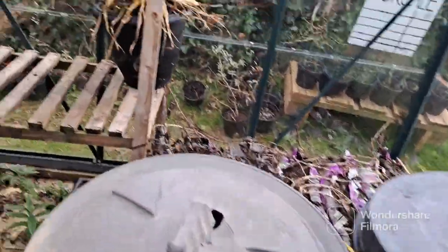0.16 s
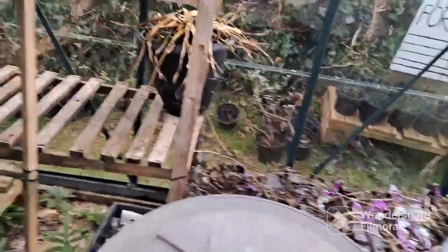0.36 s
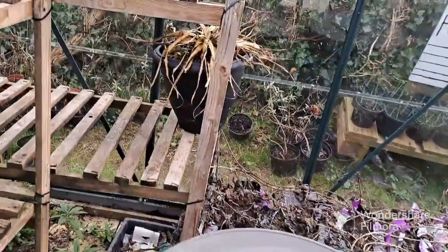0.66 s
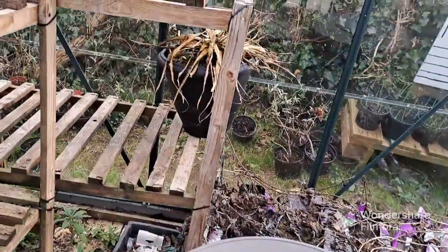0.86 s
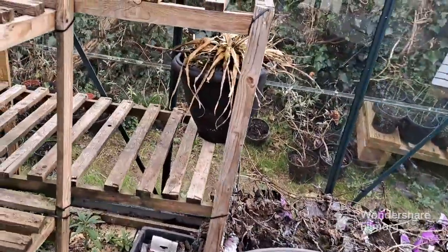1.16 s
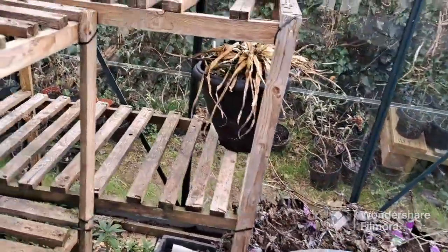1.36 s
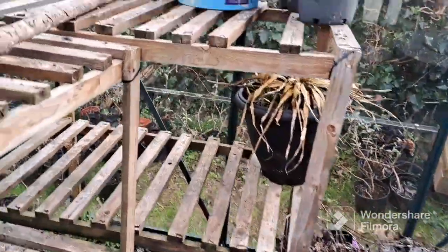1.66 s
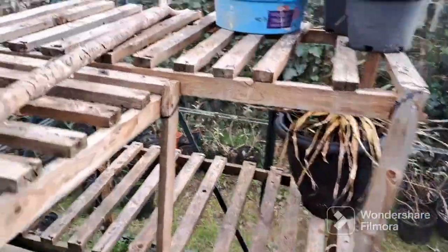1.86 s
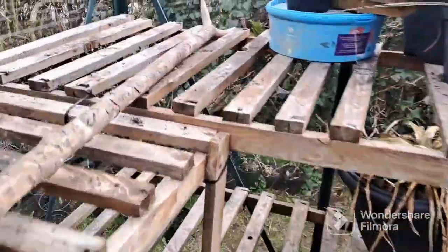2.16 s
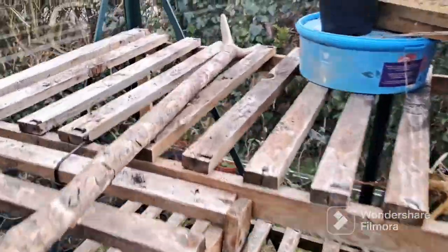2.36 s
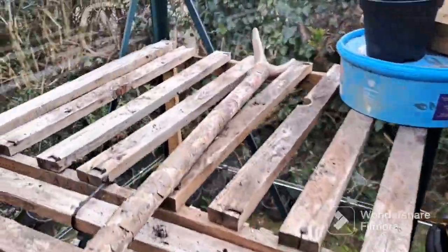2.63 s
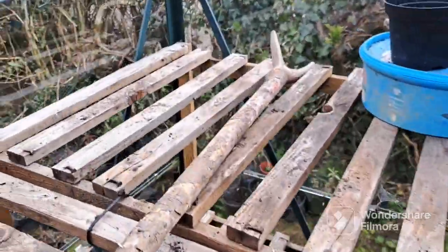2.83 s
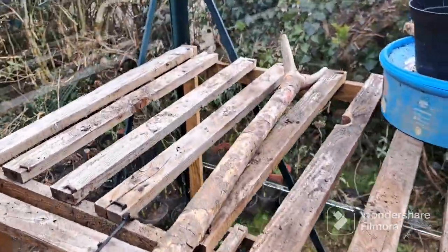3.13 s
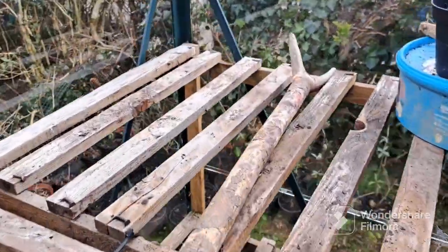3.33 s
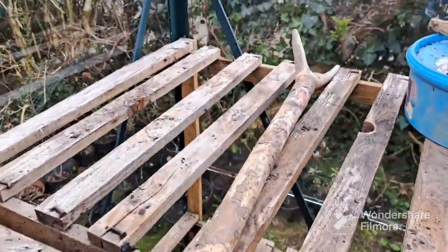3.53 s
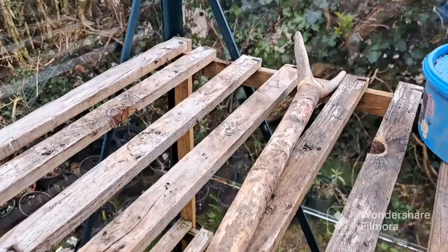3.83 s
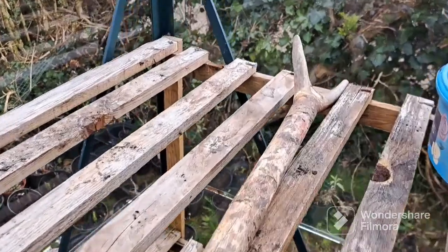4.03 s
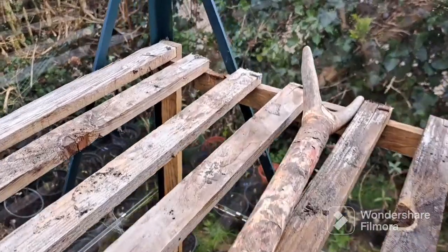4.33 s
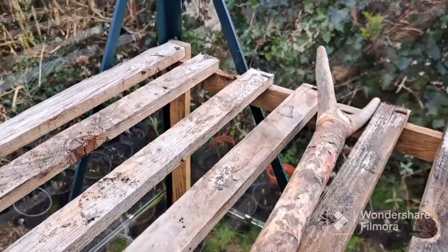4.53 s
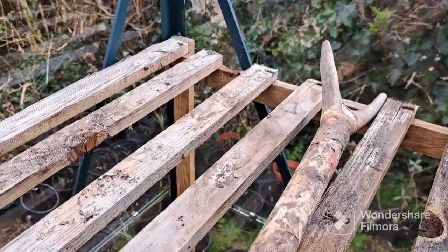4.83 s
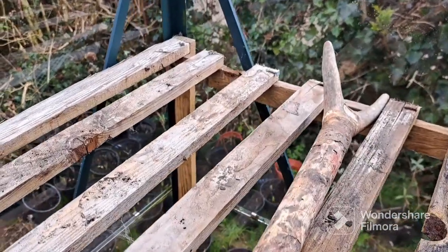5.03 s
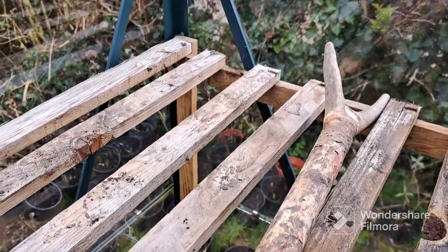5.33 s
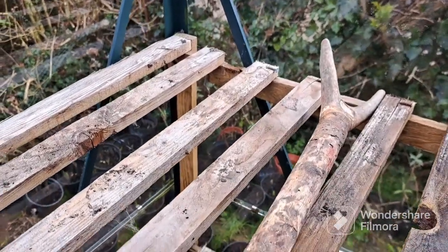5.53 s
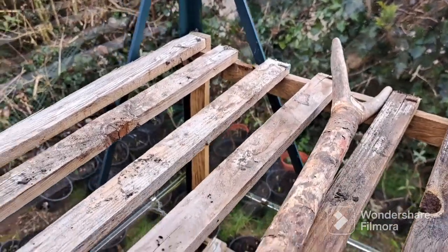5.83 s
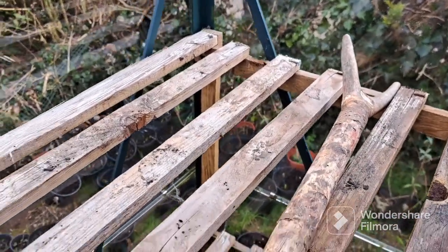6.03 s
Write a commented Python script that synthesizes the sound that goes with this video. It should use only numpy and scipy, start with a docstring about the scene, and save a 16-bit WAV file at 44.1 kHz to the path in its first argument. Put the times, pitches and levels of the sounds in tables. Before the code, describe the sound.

A close, handheld stereo capture in a small glass greenhouse, with tight hard reflections and a faint outdoor hush. For the first 0.6 seconds, low wind buffets flutter mainly on the left while a jacket swishes. Light ticks and cloth movement lead to a gritty door scrape at about 1.3 to 1.7 seconds, peaking near 1.5, with a deep thud and rattling knock near 1.8. From 2 to 3.2 seconds fabric crumples over handling rumble, with smaller clacks. Hard wooden-sounding knocks bunch at 3.4 to 3.6, the strongest around 3.5, with briefly singing panes. Another cluster at 3.9 to 4.15 mixes crisp cracks, a shorter, weaker scrape and dull thuds. Then cloth drags muffled and rough along the phone until about 5.9, strongest near 4.8, with tiny squeaks around 5.4 to 5.6. Soft bumps and a last rustle come near 6.0.

```python
"""Someone carries a phone into a small glass greenhouse: eddies burst on the left port at first, over a faint hush.
A jacket rustles from the start (shaped noise of stick-slip pulses); the door knocks in its frame (chatter bursts
through resonances), then scrapes along its track in two pushes (gritty pulses) amid more knocks, singing panes
and dull thuds (damped sines). A long drag of cloth with short squeaks follows, then a last few bumps."""
import sys
import numpy as np
from scipy import signal
from scipy.fft import rfft, irfft, next_fast_len
from scipy.io import wavfile
from scipy.ndimage import uniform_filter1d

SR = 44100
rng = np.random.default_rng(int(sys.argv[2]) if len(sys.argv) > 2 else 0)


def transcribe(u):
    """Save the signal u as a 16-bit wav file named by the first command-line argument.

    u: samples, shape (n,) or (channels, n), limited to [-1, 1]; the rate is SR.
    q: integer samples, one column per channel.
    """
    v = np.clip(np.atleast_2d(u).T, -1, 1)
    q = np.round(v * 32767).astype(np.int16)
    wavfile.write(sys.argv[1], SR, q)


N = 272538
TIME = np.arange(N) / SR
SIZE = next_fast_len(N + SR // 2, True)
FREQ = np.maximum(np.fft.rfftfreq(SIZE, 1 / SR), 1)
KNOCK_RISE_S = 0.0017

# Resonances of the door's frame and panes. Each row: centre in Hz, width in Hz, height over broad response in dB.
DOOR_MODES = [(143, 32, 2.5), (249, 63, 3), (411, 13, 2.5), (549.5, 41, 6), (685.5, 16.7, 4.5),
              (777, 31, 4), (1051, 10, 4), (1244, 130, 0.5), (1417, 22, 1), (1726, 35, -1.5),
              (1910, 50, -4), (2380, 63, 2)]


def amp(db):
    """Decibels to gain."""
    return 10 ** (np.asarray(db) / 20)


def gains(table):
    """One gain curve for each dB column, fading quickly outside the table's span."""
    s, *columns = np.transpose(table)
    outside_s = np.maximum(0, np.maximum(s[0] - TIME, TIME - s[-1]))
    fade = np.exp(-outside_s / 0.021)
    return [amp(np.interp(TIME, s, db)) * fade for db in columns]


def across(hz, values):
    """Join points on a log-frequency axis."""
    return np.interp(np.log(FREQ), np.log(hz), values)


def ring(x, spectrum, modes=()):
    """Causal minimum-phase filter of unit power: a broad spectrum with resonances standing on it."""
    hz, db = np.transpose(spectrum)
    beyond_oct = np.maximum(0, np.maximum(np.log2(hz[0] / FREQ), np.log2(FREQ / hz[-1])))
    gain = amp(across(hz, db) - np.minimum(24 * beyond_oct, 60))
    for centre_hz, width_hz, peak_db in modes:
        gain = gain * amp(peak_db / (1 + (2 * (FREQ - centre_hz) / width_hz) ** 2))
    unit_gain = gain / np.sqrt(np.mean(gain ** 2))
    # folding the cepstrum gives minimum phase
    cepstrum = irfft(np.log(unit_gain), SIZE)
    cepstrum[1:SIZE // 2] *= 2
    cepstrum[SIZE // 2 + 1:] = 0
    response = np.exp(rfft(cepstrum))
    return irfft(rfft(x, SIZE) * response, SIZE)[..., :N]


def flutter(rate_hz, depth_db):
    """A gain that wanders at random: draws held for 1/rate, then smoothed."""
    k = max(int(SR / rate_hz), 1)
    held = np.repeat(rng.standard_normal(N // k + 1), k)
    return amp(depth_db * uniform_filter1d(held, k)[:N])


def slips(rate_hz, spread_db):
    """Two streams of tiny stick-slip releases of uneven size, rms 1."""
    happens = rng.random((2, N)) < rate_hz / SR
    sign = rng.choice([-1, 1], (2, N))
    size = amp(spread_db * np.clip(rng.standard_normal((2, N)), -2, 2))
    x = happens * sign * size
    return x / np.std(x)


def blows(times, dbs, t60s, rise_s):
    """Envelope of contacts that start quickly and die away; overlaps add in power."""
    power = np.zeros(N)
    age = TIME[:SR // 2]
    for s, db, t60 in np.broadcast(times, dbs, t60s):
        start = int(s * SR)
        burst = amp(db) * (1 - np.exp(-age / rise_s)) * np.exp(-np.log(1000) * age / t60)
        power[start:start + len(age)] += burst[:N - start] ** 2
    return np.sqrt(power)


def swells(times, dbs, rises, falls):
    """Envelope of movements that swell to a peak and fade; overlaps add in power."""
    shape = 1.24  # 1 is a pointed swell, 2 a rounded one
    power = np.zeros(N)
    for s, db, rise, fall in zip(times, dbs, rises, falls):
        near = slice(max(int((s - 5 * rise) * SR), 0), int((s + 5 * fall) * SR))
        away = np.abs(TIME[near] - s) / np.where(TIME[near] < s, rise, fall)
        power[near] += (amp(db) * np.exp(-away ** shape)) ** 2
    return np.sqrt(power)


def together(*envelopes):
    """Unrelated movements add in power."""
    return np.sqrt(sum(e ** 2 for e in envelopes))


def swings(table, rise_s):
    """Damped swings of one mode each, alike in both ports."""
    out = np.zeros(N)
    age = TIME[:SR // 2]
    for s, db, hz, t60 in table:
        start = int(s * SR)
        envelope = (1 - np.exp(-age / rise_s)) * np.exp(-np.log(1000) * age / t60)
        swing = np.sin(2 * np.pi * hz * age) * envelope
        out[start:start + len(age)] += amp(db) * swing[:N - start]
    return out


def garden():
    """Still garden air: a faint steady hush of shaped noise."""
    # Hush spectrum. Each row: frequency in Hz, relative density in dB.
    hush_spectrum = [(100, -6), (500, -8.5), (2000, -16.5), (3200, -29), (15000, -22.5)]
    return amp(-64) * ring(rng.standard_normal((2, N)), hush_spectrum)


def wind():
    """Eddies burst on the left port as low noise and damped swings; the right gets 15 dB less."""
    # Wind strength. Each row: time in seconds, relative level in dB.
    wind_levels = [(0.03, -46.5), (0.22, -39), (0.42, -48.5), (0.68, -60.5)]
    # Gust spectrum. Each row: frequency in Hz, relative density in dB.
    gust_spectrum = [(15, -42), (35, -4), (60, 6), (110, -6), (180, -9.5), (280, -24.5), (500, -45),
                     (1500, -57)]
    # Sudden eddies. Each row: start in seconds, level in dB, pitch in Hz, T60 in seconds.
    buffets = [(.123, -17, 61.3, 0.1), (.192, -12.5, 55.4, 0.1), (.226, -15, 120, 0.068),
               (.29, -19.5, 76, 0.093), (.36, -14.5, 65, 0.061), (.509, -14.5, 67, 0.044)]
    gust, = gains(wind_levels)
    eddies = ring(slips(rate_hz=500, spread_db=0.5) * gust, gust_spectrum)
    return (amp(13.0) * eddies + swings(buffets, rise_s=0.002)) * amp([[0], [-15]])


def thuds():
    """Dull thuds of steps and bumps: low damped modes."""
    # Thuds. Each row: start in seconds, level in dB, pitch in Hz, T60 in seconds.
    thud_rows = [(1.545, -13, 140, 0.11), (1.771, -4, 73, 0.14), (2.789, -23, 85, 0.16),
                 (3.436, -18, 84.5, 0.18), (3.546, -21.5, 110, 0.31), (4.12, -20, 120, 0.13),
                 (6.003, -16, 61, 0.072)]
    return swings(thud_rows, rise_s=0.00084)


def grip(drone):
    """Hand and moving air rumble the phone's case, which also drones where cloth presses on it."""
    # Shaking of the case. Each row: time in seconds, relative rumble level in dB.
    grip_levels = [(.6, -52), (.88, -64), (1.02, -51.5), (1.2, -55), (1.56, -39), (1.9, -46), (2.25, -49.5),
                   (2.5, -41.5), (3.25, -47.5), (3.5, -42), (4.2, -45), (4.5, -37.5), (5.15, -43.5),
                   (6.18, -40)]
    # Spectra of rumble and drone. Each row: frequency in Hz, relative density in dB.
    rumble_spectrum = [(15, -42), (30, -17), (50, 5), (64, 6), (85, -18.5), (120, -12), (300, -50)]
    drone_spectrum = [(60, -13), (100, -0.5), (125, 2), (155, 2), (195, -11.5), (245, -7), (310, -7),
                      (400, -23), (800, -42.5)]
    rumble, = gains(grip_levels)
    low = ring(slips(rate_hz=460, spread_db=3.5) * rumble, rumble_spectrum)
    press = together(drone, amp(-9.5) * rumble)
    hollow = ring(slips(rate_hz=350, spread_db=2.5) * press, drone_spectrum)
    return amp(4.5) * low + amp(4.0) * hollow


def cloth_motion():
    """How hard sweeps, crumples and the long drag excite rub, rasp, hiss, sheen and the phone's case."""
    # Sleeve brushing past. Each row: peak time in seconds, relative hiss level in dB, sheen over hiss in dB,
    # rise in seconds, fall in seconds.
    sweep_rows = [(.02, -47, -4, 0.11, 0.096), (.28, -62, 1, 0.082, 0.073), (.76, -67, 0.5, 0.14, 0.077),
                  (1.02, -53.5, -5.5, 0.056, .18), (1.47, -48, 1.5, 0.13, 0.17),
                  (1.635, -38, 0, 0.04, 0.045), (1.79, -51, -2.5, 0.11, .12), (2.02, -51, 0.5, 0.15, 0.067),
                  (2.26, -60, -3.5, 0.14, 0.14), (2.77, -61.5, -8, 0.21, 0.096),
                  (2.95, -59.5, 0, 0.096, .08), (3.13, -59.5, 1, 0.17, 0.091),
                  (3.28, -57.5, -2, 0.074, .05), (3.5, -55.5, -4.5, 0.14, 0.3), (3.7, -60, 8, 0.089, 0.18),
                  (3.93, -46.5, -4.5, 0.055, .04), (4.122, -55, -8, 0.15, 0.15),
                  (6.02, -54, -9, 0.081, 0.065)]
    # Folds crumpling on the phone. Each row: peak time in seconds, relative rub level in dB,
    # relative case drone level in dB, half length in seconds.
    crumple_rows = [(0.03, -49.5, -42.5, 0.092), (.59, -57, -61, 0.055), (1.005, -48, -43, 0.028),
                    (1.322, -45, -50, 0.12), (1.52, -35, -32, 0.07), (1.773, -36, -27, 0.057),
                    (1.913, -45.5, -45, 0.18), (2.032, -41.5, -39.5, 0.048), (2.219, -52.5, -53, 0.027),
                    (2.342, -44, -47, 0.046), (2.518, -47.5, -48, 0.14), (2.641, -44.5, -43, 0.052),
                    (2.767, -41, -44, 0.065), (2.935, -46.5, -49.5, 0.077), (3.17, -43, -41, 0.084),
                    (3.27, -48, -52, 0.11), (3.51, -40.5, -37, 0.12), (3.597, -42, -32, 0.041),
                    (4.068, -41, -34, 0.06), (6.017, -46.5, -37.5, 0.13)]
    # Long drag of cloth along the phone. Each row: time in seconds, then relative levels in dB
    # of hiss, rub, rasp and case drone.
    drag_levels = [(4.2, -55.5, -46.5, -52.5, -39), (4.35, -48.5, -42, -46, -37),
                   (4.384, -47.5, -40.5, -46.5, -33.5), (4.76, -48, -39.5, -42.5, -28.5),
                   (5.066, -53, -49.5, -53.5, -39.5), (5.554, -50.5, -45, -43.5, -35),
                   (5.832, -56, -52.5, -49, -42.5), (5.862, -50.5, -51, -40.5, -43),
                   (5.95, -58.5, -54, -63, -46)]
    s, db, sheen_db, rise, fall = np.transpose(sweep_rows)
    sweep = swells(s, db, rise, fall)
    sweep_sheen = swells(s, db + sheen_db, rise, fall)
    s, db, drone_db, half = np.transpose(crumple_rows)
    crumple = swells(s, db, half, half)
    crumple_drone = swells(s, drone_db, half, half)
    drag_hiss, drag_rub, drag_rasp, drag_drone = gains(drag_levels)
    rub = together(crumple, amp(-1) * drag_rub)
    # seams rasp along with every movement
    rasp = together(amp(5) * sweep, amp(-4.5) * crumple, amp(2) * drag_rasp)
    hiss = together(sweep, amp(-0.5) * drag_hiss)
    sheen = together(sweep_sheen, amp(-9) * drag_hiss)
    drone = together(crumple_drone, amp(-1.5) * drag_drone)
    return rub, rasp, hiss, sheen, drone


def squeaks():
    """A seam catches: stick-slip rings one narrow resonance for a moment."""
    # Squeaks. Each row: peak time in seconds, relative level in dB, centre in Hz.
    squeak_rows = [(3.225, -45.5, 2370), (5.405, -49, 1650), (5.52, -43, 2150), (5.61, -46, 1500)]
    rise_s, fall_s, width_hz = 0.017, 0.027, 240
    out = np.zeros((2, N))
    friction = slips(rate_hz=1500, spread_db=3)
    for s, db, hz in squeak_rows:
        tone = signal.lfilter(*signal.iirpeak(hz, hz / width_hz, fs=SR), friction)
        out += tone / np.std(tone) * swells([s], [db], [rise_s], [fall_s])
    return out


def jacket(rub, rasp, hiss, sheen):
    """Coarse folds rub, seams rasp and snag, fine threads hiss; crisp ticks of knocks and cloth stand out."""
    # Crisp ticks and swishes: bright cracks of knocks, and snaps of cloth.
    # Each row: start in seconds, relative level in dB.
    swish_rows = [(2.776, -44.5), (2.964, -43.5), (3.076, -43), (3.367, -35), (3.528, -37), (3.549, -34.5),
                  (3.701, -41), (3.735, -43), (3.768, -42), (3.803, -44.5), (3.873, -27.5), (3.906, -30.5),
                  (4.013, -36), (4.135, -37), (5.978, -32.5), (6.004, -30)]
    # Spectra of the layers. Each row: frequency in Hz, relative density in dB.
    rub_spectrum = [(150, -31.5), (330, -4), (450, 4.5), (620, -0.5), (800, -6.5), (1050, -4.5),
                    (1400, -12), (2600, -26.5)]
    rasp_spectrum = [(500, -35.5), (850, 1), (1080, 0), (1280, 0.5), (1520, 3.5), (1750, 0), (2100, 3),
                     (2450, -3.5), (3200, -13), (6000, -49.5)]
    hiss_spectrum = [(1500, -23), (2600, 0.5), (3400, -1.5), (4200, 1), (5100, 2), (6200, -2), (8200, -1.5),
                     (9400, -14.5), (12000, -47)]
    sheen_spectrum = [(7000, -7), (9400, -6.5), (10800, -4.5), (12600, -0.5), (14000, -6), (15800, -8.5)]
    swish_spectrum = [(1200, 8.5), (2500, 8), (3400, 3.5), (5000, 8.5), (6500, 5), (8200, 1), (9500, -1.5),
                      (12600, 2), (15800, -8)]
    drag = flutter(rate_hz=50, depth_db=1.53)
    catch = flutter(rate_hz=49, depth_db=1.5)
    folds = ring(slips(rate_hz=900, spread_db=2.5) * rub * drag, rub_spectrum)
    seams = ring(slips(rate_hz=1800, spread_db=1.5) * rasp * drag, rasp_spectrum)
    # single threads that snag and let go
    snags = ring(slips(rate_hz=90, spread_db=3.5) * rasp, rasp_spectrum)
    threads = ring(slips(rate_hz=16000, spread_db=2.5) * hiss * catch, hiss_spectrum)
    gloss = ring(slips(rate_hz=18000, spread_db=3.5) * sheen * catch, sheen_spectrum)
    s, db = np.transpose(swish_rows)
    crack = blows(s, db, 0.12, rise_s=0.002)
    crisp = ring(slips(rate_hz=9200, spread_db=3.5) * crack, swish_spectrum)
    coarse = amp(0.5) * folds + amp(-4.5) * seams + amp(-12.5) * snags
    return coarse + amp(0.5) * threads + amp(1.5) * gloss + amp(-4.5) * crisp


def pane_rings():
    """A loose pane or rail sings briefly: one damped mode each."""
    # Rings. Each row: start in seconds, level in dB, pitch in Hz, T60 in seconds.
    ring_rows = [(.689, -41, 560, 0.036), (1.761, -15, 335, 0.044), (2.179, -37.5, 774, 0.063),
                 (2.815, -28, 314, 0.072), (3.532, -16, 288.4, 0.13), (3.559, -24.5, 1917, .057),
                 (3.953, -19.5, 550, 0.047), (4.027, -21, 530, .07), (4.087, -20.5, 423, 0.31),
                 (4.138, -18, 426, .14), (5.644, -28.5, 444, .063), (6.04, -37, 1030, 0.084)]
    return swings(ring_rows, rise_s=0.00036)


def door_slide():
    """The door is dragged along its track: the runner judders over grit and shakes the panes."""
    # Two pushes, a list each. Each row: time in seconds, relative scrape level in dB, relative panel level in dB.
    pushes = [
        [(1.27, -52, -36.5), (1.33, -35, -34.5), (1.38, -36, -32.5), (1.436, -25, -18), (1.506, -19.5, -16),
         (1.56, -30, -22), (1.63, -29.5, -22.5), (1.68, -33.5, -32)],
        [(3.9, -44, -44), (3.958, -27.5, -47), (3.986, -35, -47), (4.034, -36, -36), (4.068, -45, -28),
         (4.092, -42, -31), (4.146, -37, -30.5), (4.19, -52, -46)],
    ]
    # Spectra of scrape and panels. Each row: frequency in Hz, relative density in dB.
    scrape_spectrum = [(150, -51), (330, 2.5), (450, -1), (560, 5), (800, 4), (1000, 0.5), (1400, -4.5),
                       (2100, -10), (2700, -21), (3500, -27), (7000, -42)]
    panel_spectrum = [(60, -21.5), (100, -4.5), (140, 8), (170, -4.5), (215, 2), (270, 0), (330, -8),
                      (420, -17), (800, -44.5)]
    scrape, shake = sum(np.array(gains(push)) for push in pushes)
    judder = flutter(rate_hz=130, depth_db=0.5)
    grit = ring(slips(rate_hz=1300, spread_db=3.5) * scrape * judder, scrape_spectrum, DOOR_MODES)
    panes = ring(slips(rate_hz=900, spread_db=2.5) * shake, panel_spectrum, DOOR_MODES)
    return amp(-2.5) * grit + amp(-0.5) * panes


def impacts(times, dbs, t60s):
    """One sharp push at the start of each blow, as energetic as its chatter, with a random side part."""
    out = np.zeros((2, N))
    size = amp(dbs) * np.sqrt(t60s * SR / (2 * np.log(1000)))
    at = ((times + KNOCK_RISE_S) * SR).astype(int)
    out[:, at] = size, size * rng.uniform(-1, 1, len(times))
    return out


def knocks():
    """Door blows and scuffs: each strikes once and sets loose panes chattering for a moment."""
    # Knocks. Each row: start in seconds, relative level in dB, relative low body level in dB, T60 in seconds.
    knock_rows = [(0.515, -48, -34, 0.085), (0.54, -46.5, -51, .12), (0.688, -39, -43, 0.13),
                  (0.976, -37.5, -37.5, 0.41), (1.49, -16.5, -22, 0.1), (1.756, -22.5, -17, 0.14),
                  (1.771, -22, -27, 0.066), (2.176, -43, -58, 0.084), (2.293, -35, -52.5, 0.23),
                  (2.427, -35, -31.5, 0.11), (2.444, -24.5, -36, 0.072), (2.774, -27, -26.5, 0.19),
                  (2.817, -33.5, -22, 0.13), (3.077, -27.5, -27.5, 0.092), (3.214, -28.5, -29, 0.17),
                  (3.367, -15, -18.5, 0.13), (3.409, -17, -15.5, 0.13), (3.429, -20, -22, 0.089),
                  (3.527, -9.5, -11, 0.12), (3.556, -22.5, -16.5, 0.16), (3.643, -24.5, -18.5, 0.08),
                  (3.902, -23, -17.5, .13), (3.953, -33, -21.5, .14), (3.999, -31, -19.5, 0.12),
                  (4.026, -24.5, -23.5, 0.11), (4.094, -24, -16, 0.083), (4.12, -19, -21, 0.1),
                  (4.136, -29, -29, 0.16), (5.64, -35, -43, .1), (5.852, -34.5, -49, 0.2),
                  (5.988, -37, -35, .12)]
    # Spectra of clack and body. Each row: frequency in Hz, relative density in dB.
    clack_spectrum = [(150, -42.5), (330, -3), (480, -1.5), (720, 0.5), (1000, -7), (1400, -9),
                      (2000, -10.5), (2700, -20.5), (3500, -27.5), (7000, -38)]
    body_spectrum = [(80, -19.5), (130, -2.5), (200, -20), (270, 3.5), (340, -7), (450, -12), (620, -20),
                     (1500, -34.5)]
    s, db, body_db, t60 = np.transpose(knock_rows)
    chatter = slips(rate_hz=4000, spread_db=2.0) * blows(s, db, t60, KNOCK_RISE_S)
    clack = ring(chatter + amp(-8) * impacts(s, db, t60), clack_spectrum, DOOR_MODES)
    # the heavy frame follows more slowly than the panes
    heave = slips(rate_hz=3000, spread_db=4.0) * blows(s, body_db, t60, 2 * KNOCK_RISE_S)
    body = ring(heave, body_spectrum, DOOR_MODES)
    return amp(-6.5) * clack + amp(-2.5) * body


def ports(pair):
    """Mid and side to left and right: bass moves both ports together; higher up they part, mostly tilted right."""
    # The two ports. Each row: frequency in Hz, likeness from -1 to 1, left minus right in dB.
    port_rows = [(60, 0.99, -1.4), (128, 0.98, 0.1), (290, 0.89, -1), (600, 0.67, -2), (1110, -0.13, -4.5),
                 (1760, -0.014, -8), (3270, -0.048, 1.5), (6000, -0.02, -2.5), (15000, 0, -2)]
    hz, likeness, tilt_db = np.transpose(port_rows)
    likeness = np.clip(across(hz, likeness), -.99, .99)
    tilt_db = across(hz, tilt_db)
    mid, side = rfft(pair, SIZE)
    side = side * np.sqrt((1 - likeness) / (1 + likeness))
    left = (mid + side) * amp(tilt_db / 2)
    right = (mid - side) * amp(-tilt_db / 2)
    return irfft(np.array([left, right]), SIZE)[:, :N]


def glass_echoes(pair):
    """Close hard surfaces comb the mids and highs; the combs glide as the phone moves."""
    # Nominal echo delays of the nearest panes and staging. A single column: delay in seconds.
    pane_lags_s = [.0012, .0017, .0027, .0036, .0052, .0068, .0105, .016]
    bright = signal.sosfilt(signal.butter(2, 450, "high", fs=SR, output="sos"), pair)
    out = pair.copy()
    for port in range(2):
        for lag_s in pane_lags_s:
            offset, phase, pace = rng.random(3)
            glide_s = .00012 * np.sin(2 * np.pi * (phase + .3 * pace * TIME))
            path_s = lag_s * (.8 + .4 * offset) + glide_s
            out[port] += .18 * np.interp(TIME - path_s, TIME, bright[port], left=0)
    return out


def scene():
    """Near sounds through the two ports with glass echoes, plus thuds, pane rings and wind."""
    rub, rasp, hiss, sheen, drone = cloth_motion()
    cloth = jacket(rub, rasp, hiss, sheen) + squeaks()
    near = glass_echoes(ports(cloth + grip(drone) + door_slide() + knocks() + garden()))
    return amp(-1) * near + thuds() + pane_rings() + wind()


def record(dry):
    """The phone rounds the tallest peaks and cuts the top."""
    top_hz = 15830
    rounded = .7 * np.tanh(dry / .7)
    return signal.sosfilt(signal.ellip(12, .1, 80, top_hz, fs=SR, output="sos"), rounded)


dry = scene()
out = record(dry)
transcribe(out)
```